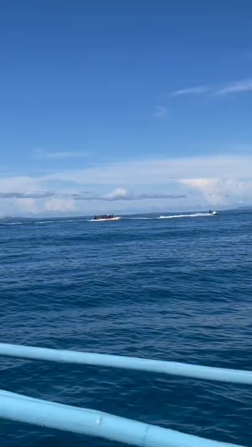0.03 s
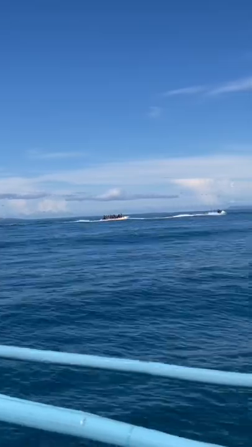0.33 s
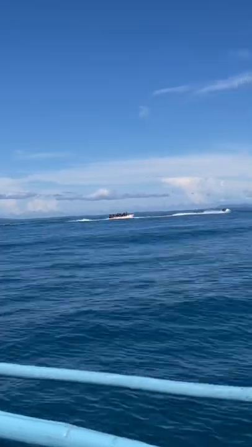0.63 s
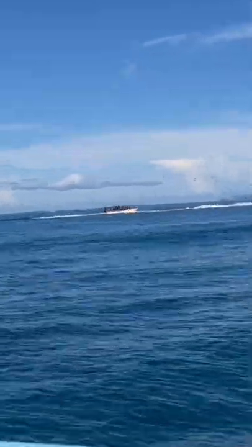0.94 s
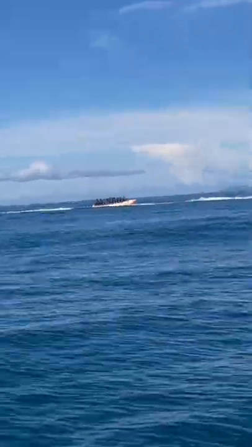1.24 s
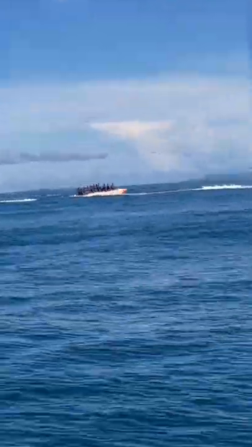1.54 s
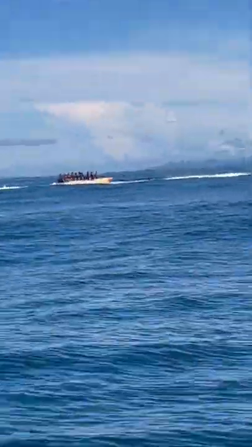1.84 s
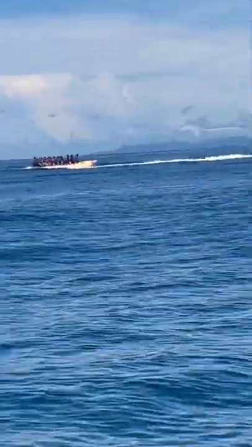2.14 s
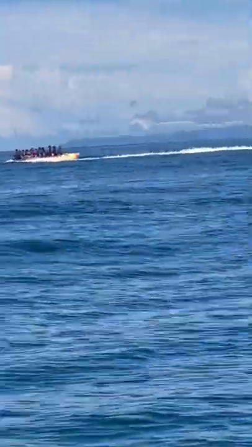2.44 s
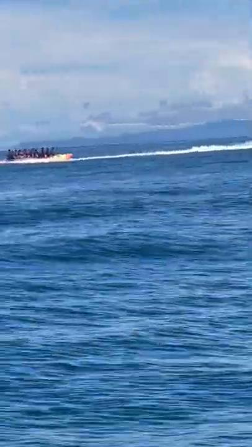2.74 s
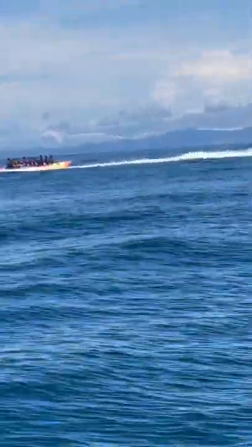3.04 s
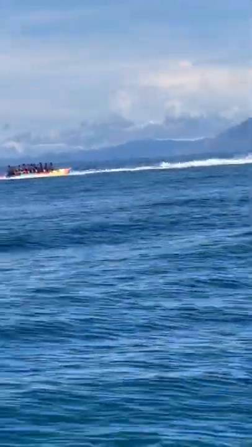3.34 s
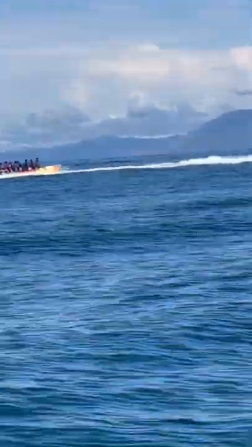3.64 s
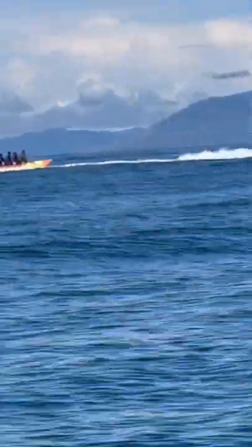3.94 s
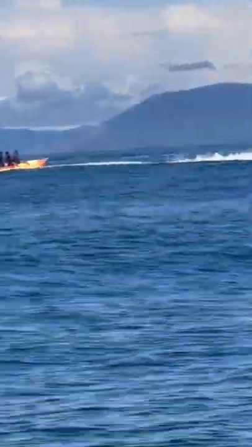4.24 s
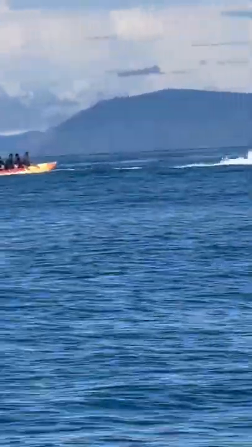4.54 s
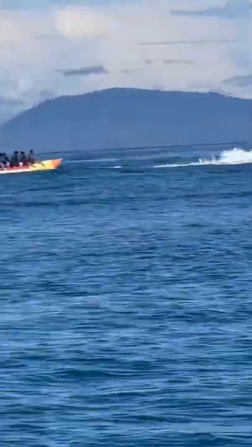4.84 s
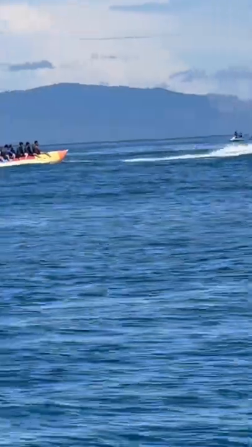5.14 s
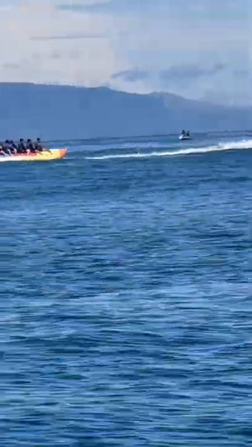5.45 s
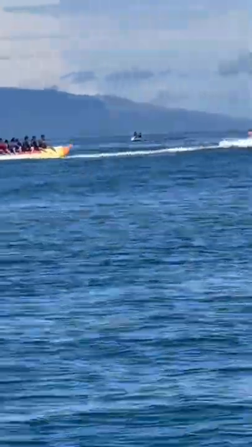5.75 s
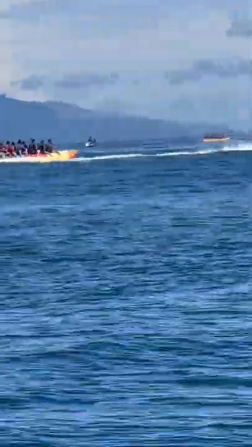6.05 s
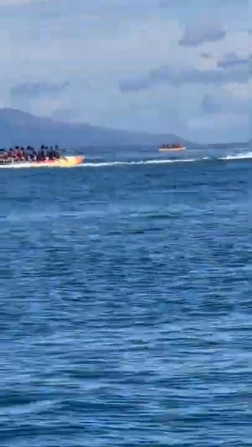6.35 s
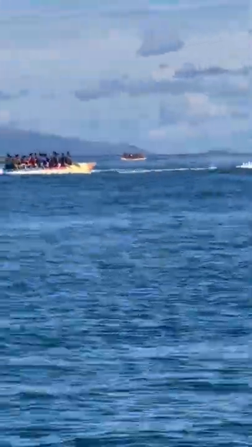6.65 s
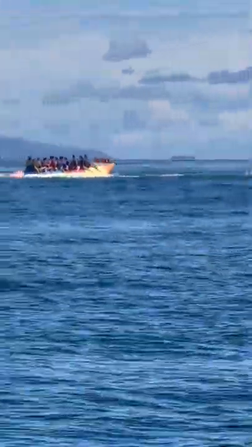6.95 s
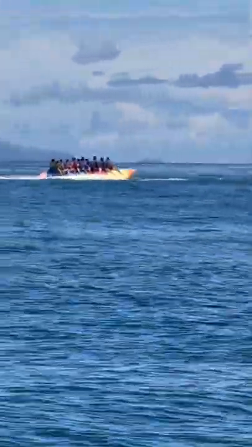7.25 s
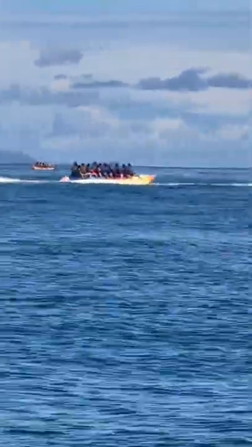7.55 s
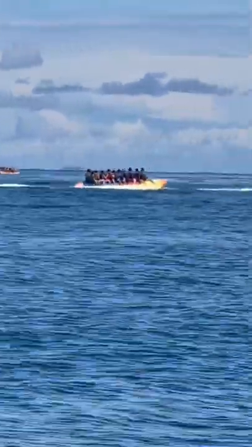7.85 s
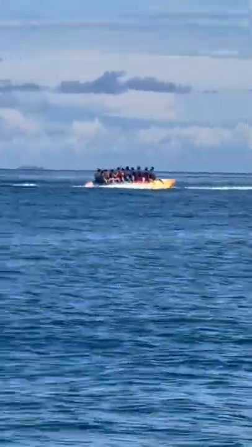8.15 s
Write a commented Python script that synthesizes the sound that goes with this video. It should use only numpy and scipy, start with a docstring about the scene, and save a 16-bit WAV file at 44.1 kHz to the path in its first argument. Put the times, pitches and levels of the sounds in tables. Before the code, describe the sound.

A one-cylinder engine is already running at the start, heard close up on board a small boat at sea. It chugs loudly and evenly at about nineteen beats a second for the whole eight seconds, each beat a low thump with a knock through the deck and a bright rattle of loose metal. A faint, steady wash of water lies beneath it. At about 1 second the stereo image narrows and the knocking softens slightly. Wind rumbles on the microphone throughout, with gusts and short, dull pops from about 1.8 to 3.4 seconds and again near 4.2. The strongest buffeting comes between 5.7 and 6.7 seconds, when the clatter is also a little louder. One more brief gust hits around 7.5 seconds, and the engine keeps the same pace to the end.

```python
"""A one-cylinder engine chugs at about 19 firings a second, heard on board a small outrigger boat.
Each working cycle drives low pressure pulses through exhaust and hull, knocks the deck into resonance
and sets loose metal clattering. Wind eddies buffet the two microphone ports over a faint wash of sea.
After about a second the camera zooms in, and its stereo pickup narrows."""
import sys
import numpy as np
from scipy import signal
from scipy.fft import rfft, irfft, next_fast_len
from scipy.io import wavfile
from scipy.ndimage import uniform_filter1d, map_coordinates

SR = 44100
rng = np.random.default_rng(int(sys.argv[2]) if len(sys.argv) > 2 else 0)


def bounce(signal):
    """Save signal as a 16-bit WAV file at the path given by the first command-line argument."""
    frames = np.transpose(np.atleast_2d(signal))
    limited = np.clip(frames, -1, 1)
    pcm = np.round(limited * 32767).astype(np.int16)
    wavfile.write(sys.argv[1], SR, pcm)


N = 361179
TIME = np.arange(N) / SR

# single eddies that strike the ports: t/s, envelope peak level/dB, f/Hz
EDDY_STRIKES = [(1.82, -12, 370), (1.858, -13, 350), (1.89, -15, 315), (2.093, -8, 400), (2.112, -11, 420),
                (2.196, -15, 380), (2.288, -13, 270), (2.342, -9, 350), (2.548, -14, 380),
                (2.643, -13, 380), (2.656, -12, 270), (2.765, -15, 370), (3.075, -11, 300),
                (3.355, -14, 300), (4.203, -13, 280), (5.581, -16, 350), (5.746, -12, 320),
                (5.786, -6, 420), (5.801, -10, 340), (5.819, -10, 360), (5.852, -9, 410), (5.888, -9, 420),
                (5.948, -12, 350), (6.003, -7, 270), (6.053, -11, 380), (6.095, -13, 300),
                (6.114, -7.5, 520), (6.164, -13, 290), (6.367, -10, 500), (6.373, -4, 430),
                (6.529, -11, 460), (6.684, -15, 340), (6.711, -12, 250), (7.489, -15, 325)]


def amp(db):
    """Decibels to amplitude ratio."""
    return 10 ** (np.asarray(db) / 20)


def unit(x):
    """Normalisation to rms 1."""
    return x / np.sqrt(np.mean(x ** 2) + 1e-20)


def along(points, hz):
    """Interpolation of (f/Hz, value) points on a logarithmic frequency axis."""
    f, values = np.transpose(points)
    return np.interp(np.log(hz + 1), np.log(f + 1), values)


def curve(points):
    """Linear interpolation of (t/s, value) points at every sample."""
    return np.interp(TIME, *np.transpose(points))


def wobble(rate):
    """Smooth random modulation: a spline through `rate` knots a second."""
    return map_coordinates(rng.standard_normal(int(N * rate / SR) + 4), [TIME * rate])


def filtered(x, response):
    """Linear filtering: the spectrum of x times a frequency response."""
    size = next_fast_len(N + SR // 4)
    return irfft(rfft(x, size) * response(np.fft.rfftfreq(size, 1 / SR)), size)[..., :N]


def split(x, edge_hz):
    """Complementary crossover: the parts of x below and above an edge."""
    low = filtered(x, lambda hz: 1 / (1 + (hz / edge_hz) ** 10))
    return low, x - low


def taps(times, sizes):
    """An impulse train: each blow lasts one sample."""
    at = np.round(times * SR).astype(int)
    inside = (at >= 0) & (at < N)
    return np.bincount(at[inside], sizes[inside], N)


def colour(pair, spectrum, patchy_db):
    """Partial coherence: two independent signals mix to stereo whose spectrum flickers in patches."""
    # likeness of the sound at the two ports: f/Hz, coherence
    coherence = [(60, .87), (130, .78), (300, .58), (500, .15), (700, .1), (900, .4), (1300, .42),
                 (1600, .2), (2300, .35), (4000, .25), (7000, .45), (7800, .7), (8600, .9), (9400, .78),
                 (10200, .98), (11300, .82), (11800, .99), (12400, .97), (13000, .6)]
    cells = signal.stft(pair, nperseg=512)[2]
    patches = uniform_filter1d(rng.standard_normal(cells.shape[1:]), size=5, axis=0)
    patches = unit(uniform_filter1d(patches, size=8, axis=1))
    pair = signal.istft(cells * amp(patchy_db * np.minimum(patches, 1.7)), nperseg=512)[1][:, :N]

    def mid_side_gains(hz):
        angle = np.arccos(np.clip(along(coherence, hz), 0, 1)) / 2
        return amp(along(spectrum, hz)) * [np.cos(angle), np.sin(angle)]

    mid, side = filtered(pair, mid_side_gains)
    return unit(np.array([mid + side, mid - side]))


def zoom(pair, midpoint_s=0.89, length_s=0.27):
    """Mid-side narrowing: a wide image leaning left fades into one with a weaker side signal."""
    # treble imbalance of the wide pickup: f/Hz, left minus right level/dB
    lean = [(2700, 0), (3300, 2.5), (4000, 1.5), (5400, 6), (7000, 6.5), (7800, 2), (8700, 0)]
    # side response of the narrow pickup: f/Hz, level/dB
    side_response = [(1400, 0), (1900, -6.5), (2400, -9), (4000, -11.5), (5000, -15), (6000, -23),
                     (7300, -24), (7900, -7), (8600, -9), (9200, 0)]
    wide = filtered(pair, lambda hz: amp(.5 * np.outer([1, -1], along(lean, hz))))
    side = filtered((pair[0] - pair[1]) / 2, lambda hz: amp(along(side_response, hz)))
    narrow = pair.mean(axis=0) + np.outer([1, -1], side)
    closed = np.clip(.5 + (TIME - midpoint_s) / length_s, 0, 1)
    return (1 - closed) * wide + closed * narrow


def ports(hz):
    """Transfer function of the two ports: their phase and level differences depend on frequency."""
    # lead of the left port: f/Hz, phase/rad
    lead = [(100, -.1), (340, -.25), (500, -.9), (650, -2.8), (1400, -2.9), (1800, -5.95), (3100, -5.62),
            (4200, -6.05), (6500, -6.25), (8000, -6.08), (8800, -6.3), (9900, -8.9), (10250, -9.4),
            (11400, -11.6), (11750, -12.5), (12400, -12.85)]
    # imbalance of the ports: f/Hz, left minus right level/dB
    tilt = [(80, 0), (150, 1.1), (250, 2.7), (440, 2), (600, -1), (900, -2.5), (1200, -1.2), (1600, 2.2),
            (2600, -.8), (5500, .7), (9000, 0)]
    halves = np.array([[.5], [-.5]])
    return np.exp(1j * halves * along(lead, hz)) * amp(halves * along(tilt, hz))


def water():
    """The sea washes along the hull as nearly stationary broadband noise."""
    # spectral density of the wash: f/Hz, relative level/dB
    wash = [(100, -29), (400, 6), (900, 1.5), (2000, -1.5), (5000, -11.5), (10000, -39), (13500, -45)]
    return amp(-34.5 + 0.14 * wobble(3.1)) * colour(rng.standard_normal((2, N)), wash, patchy_db=1)


def swells(rows):
    """Incoherent addition: Gaussian swells (t/s, level/dB, half-length/s) sum in power to one gain."""
    return np.sqrt(sum((amp(db) * np.exp(-.5 * ((TIME - s) / length) ** 2)) ** 2
                       for s, db, length in rows))


def wind(breeze_db=-41.5, flurry_db=-12.5, flurry_s=0.012):
    """Turbulence: large eddies rumble, small ones sound brighter, and both grow with each gust."""
    # gusts, weighed against breeze_db: t/s, level/dB, half-length/s
    gusts = [(1.5, -40, 0.069), (1.88, -34.5, .12), (2.11, -31, 0.031), (2.65, -36.5, 0.2),
             (3.08, -31, 0.045), (3.37, -34.5, 0.08), (4.12, -31, .11), (5.3, -37.5, 0.17),
             (5.79, -28.5, 0.057), (6.08, -32.5, 0.24), (6.62, -34.5, 0.11), (7.46, -32.5, 0.054)]
    # spectral density of the large eddies: f/Hz, relative level/dB
    large_eddies = [(15, -44), (28, -35), (42, -18), (55, -13), (85, -5.5), (150, -10), (250, -13),
                    (400, -27.5), (800, -67)]
    # spectral density of the small eddies: f/Hz, relative level/dB
    small_eddies = [(60, 7), (150, -9), (280, 1.5), (450, -3.5), (700, -13), (1200, -38), (3000, -64)]
    gust = np.hypot(1, swells(gusts) / amp(breeze_db))
    rumble_gain = amp(-26 + 2.1 * wobble(14)) * gust ** 0.94
    rumble = colour(rng.standard_normal((2, N)), large_eddies, patchy_db=1)
    swirl_gain = amp(-39 + 3 * wobble(60)) * gust ** 0.97
    swirl = colour(rng.standard_normal((2, N)), small_eddies, patchy_db=1.5)
    # a brief flurry surrounds each slap
    flurries = swells([(s, db + flurry_db, flurry_s) for s, db, _ in EDDY_STRIKES])
    return rumble_gain * rumble + np.hypot(swirl_gain, flurries) * swirl


def slaps(skew_rad=.75, half_length_cycles=.31):
    """An eddy striking the ports is one short pressure swing, with a different phase at each."""
    out = np.zeros((2, N))
    t = np.arange(-SR // 100, SR // 100) / SR
    phases = skew_rad * rng.standard_normal((len(EDDY_STRIKES), 2, 1))
    for (s, db, hz), phase in zip(EDDY_STRIKES, phases):
        envelope = amp(db) * np.exp(-.5 * (t * hz / half_length_cycles) ** 2)
        start = round((s + t[0]) * SR)
        out[:, start:start + len(t)] += envelope * np.sin(2 * np.pi * hz * t + phase)
    return out


def crank(first_firing_s=.0348):
    """Working cycles since the first firing: a four-stroke cylinder fires once in two revolutions."""
    # crankshaft speed: t/s, speed/rpm
    speed = [(0.0, 2311), (0.5, 2276), (0.9, 2306), (1.4, 2296), (2.0, 2312), (3.0, 2303), (4.0, 2312),
             (4.7, 2286), (5.7, 2294), (6.3, 2303), (6.9, 2313), (7.3, 2289), (7.8, 2334), (8.2, 2289)]
    cycles = np.cumsum(curve(speed)) / (2 * 60 * SR)
    return cycles - np.interp(first_firing_s, TIME, cycles)


def harmonics(cycles, orders, waver_rad):
    """Multiples of the firing rate, each randomly modulated in amplitude and phase."""
    return sum(amp(db + 2 * wobble(3)) * unit(np.sin(2 * np.pi * k * cycles + waver_rad * wobble(10)))
               for k, db in orders)


def hum(cycles):
    """Forced vibration at engine orders: the drive's hum fades early while the hull drones on."""
    # partials of the drive: harmonic number, relative level/dB
    drive_orders = [(11, -12), (16, -15), (22, -13), (23, -8), (47, -17)]
    # fading of the drive's hum: t/s, level/dB
    drive_level = [(0, -28), (.8, -30), (1.3, -35), (2.2, -38), (8.2, -44)]
    # partials of the hull: harmonic number, level/dB
    hull_orders = [(11, -41), (12, -40), (14, -43), (16, -42), (19, -50), (21, -49), (22, -50), (23, -50)]
    drive = amp(curve(drive_level)) * harmonics(cycles, drive_orders, waver_rad=.45)
    return drive + harmonics(cycles, hull_orders, waver_rad=.4)


def knock(fired, delay_s=0.004, jitter_s=0.0002, scatter_db=3, rise_s=0.0049):
    """Impulse excitation: the piston's knock rings the damped modes of the deck once a cycle."""
    # modes of engine mount and deck: f/Hz, relative level/dB, t60/s
    modes = [(252, 11, 0.071), (452, 1, 0.1), (507, 4, 0.046), (644, 7.5, 0.072), (800, 5, 0.062),
             (873, 9, 0.052), (947, 7, 0.06), (1170, -2, .06), (1420, 2, 0.039)]
    t = np.arange(SR // 4) / SR
    ring = sum(amp(db - 60 * t / t60) * np.sin(2 * np.pi * hz * t) for hz, db, t60 in modes)
    ring *= 1 - np.exp(-t / rise_s)
    late, size = rng.standard_normal((2, len(fired)))
    blows = taps(fired + delay_s + jitter_s * late, amp(scatter_db * size))
    return unit(signal.fftconvolve(blows, ring)[:N])


def reflected(x, echo_db=-7.5, t60=0.043):
    """Early reflections off deck and gunwales add a short tail, different at each port."""
    t = np.arange(SR // 10) / SR
    tail = rng.standard_normal((2, len(t))) * amp(-60 * t / t60)
    tail /= np.linalg.norm(tail, axis=1, keepdims=True)
    return unit(x + amp(echo_db) * signal.oaconvolve(x[None], tail, axes=1)[:, :N])


def impacts(fired, lead_s=.003, spread_s=.005, scatter_db=2, strikes=3):
    """Repeated impact: one loose part strikes a few times around each firing."""
    u, v, size = rng.standard_normal((3, len(fired), strikes))
    times = fired[:, None] - lead_s + spread_s * np.hypot(u, v / 2)
    return taps(times.ravel(), amp(scatter_db * size).ravel())


def rattle(fired, t60=.16, hold_s=.005, parts=6):
    """High modal density: loose metal parts ring as decaying noise. Returns ringing and blows."""
    # metallic clatter up to about 13 kHz; above 13.4 kHz only a very faint thin sound remains: f/Hz, relative
    # level/dB
    spectrum = [(200, 3.5), (800, -9), (1200, -5.5), (1800, -2), (2900, -2.5), (4300, -8), (6500, -4.5),
                (8400, -1), (9500, -2), (10400, 1.5), (11500, -5), (12900, -21), (13400, -50), (15600, -36)]
    t = np.arange(SR // 7) / SR
    blows = np.array([impacts(fired) for _ in range(parts)])
    rings = rng.standard_normal((parts, 2, len(t))) * amp(-60 * np.maximum(t - hold_s, 0) / t60)
    ringing = sum(signal.oaconvolve(part[None], ring, axes=1)[:, :N] for part, ring in zip(blows, rings))
    return colour(ringing, spectrum, patchy_db=3.8), blows


def covers(blows, width=.7, rest_db=-9, spell_rise_db=6):
    """Resonance: the blows keep modes of covers and pipes ringing, each loudest in its own spell."""
    # modes: f/Hz, relative level/dB, t60/s, peak of the spell t/s, its half-length/s
    modes = [(904, -43, .08, .4, .5), (1058, -45, .08, .4, .7), (1383, -37.5, .1, .5, .3),
             (1460, -42, .06, .4, .5), (1710, -41, .06, 3.5, 4), (1860, -41, .05, 5.8, 1.5),
             (1975, -40, .06, 7.3, 1.6), (2150, -42, .05, 2.2, 1.2), (2380, -41.5, .05, 5.9, 1),
             (2470, -40, .07, .28, .1), (2727, -40.5, .11, 1.6, 1), (3020, -43, .05, 6.4, 1.6),
             (3400, -48, .08, 6.8, 1.3), (3610, -46.5, .07, 7, 1.7), (3720, -47, .11, 7, 1.7)]
    mid = blows[::2].sum(axis=0)
    side = width * blows[1::2].sum(axis=0)
    force = np.array([mid + side, mid - side])
    out = np.zeros((2, N))
    for hz, db, t60, s, length in modes:
        radius = amp(-60 / (t60 * SR))
        feedback = [1, -2 * radius * np.cos(2 * np.pi * hz / SR), radius ** 2]
        ring = signal.lfilter([1, 0, -1], feedback, force)
        spell = np.exp(-.5 * ((TIME - s) / length) ** 2)
        out += amp(db + rest_db + spell_rise_db * spell) * unit(ring)
    return out


def accents(cycles, fired, lead_cycles=.08):
    """Cycle-to-cycle variation: gains of clank and sizzle, each held for one working cycle."""
    # harder and softer firings: t/s, extra clank level/dB, extra sizzle level/dB
    uneven_firings = [(.14, 3, 0), (.24, 3.5, 0), (1.19, .5, -3), (1.24, -2.5, 0), (1.5, 2.5, 2),
                      (1.6, -2.5, -.5), (1.66, 1.5, -3.5), (1.92, 0, 2.5), (2.12, -3, 0), (2.28, -3, -.5),
                      (2.8, 2, 3), (2.9, 0, -3), (3.11, -3.5, 1.5), (3.16, 2.5, -1), (3.22, -2, -2),
                      (3.37, -1, -3), (3.53, 2.5, 2.5), (3.68, -2.5, -1), (4.36, -4, 0), (4.41, 3, -1.5),
                      (4.88, -2.5, -2), (4.94, 4, -.5), (5.3, 1.5, 1.5), (5.51, 2, 2), (5.88, .5, 3.5),
                      (5.98, 1.5, 1.5), (6.19, 0, -3.5), (6.4, 4.5, -2.5), (6.45, -3.5, -2.5),
                      (6.61, 2.5, .5), (6.66, 0, 3), (7.02, -1, -3), (7.08, 1.5, 2), (7.65, 3.5, 4.5),
                      (7.91, 0, -3.5), (8.01, 1, 1.5), (8.12, 0, 3), (8.17, 2.5, 1)]
    db = np.zeros((len(fired) + 1, 2))
    for s, clank_db, sizzle_db in uneven_firings:
        db[np.argmin(np.abs(fired - s))] = clank_db, sizzle_db
    return amp(db)[(cycles + lead_cycles).astype(int)].T


def exhaust(fired, boom_db=-23.5, thump_db=-18.4, jitter_s=0.0002):
    """Source and filter: exhaust and hull round each cycle's pressure pulses into boom and thump."""
    # pulses of one cycle: t/s after firing, relative level/dB
    strokes = [(.0041, 0.5), (0.0104, 2.5), (.032, -4), (.044, -25.5)]
    # response of exhaust and hull: f/Hz, relative level/dB
    response = [(8, -90), (25, -34), (38, -39), (57, -5.5), (77, 3), (96, 5.5), (135, 1), (172, -1),
                (210, -11.5), (270, -9.5), (350, -30), (440, -35), (560, -20), (900, -75)]
    delay, db = np.transpose(strokes)
    late, scatter_db = rng.standard_normal((2, len(fired), len(delay)))
    times = fired[:, None] + delay + jitter_s * late
    pulses = taps(times.ravel(), -amp(db + scatter_db).ravel())
    chug = filtered(pulses, lambda hz: amp(along(response, hz)))
    boom, thump = split(chug, edge_hz=68)
    return amp(boom_db + 1.54 * wobble(3.1)) * unit(boom) + amp(thump_db + .5 * wobble(9.5)) * unit(thump)


def engine():
    """Synchronous excitation: one crank times the hum, knock, clatter and exhaust."""
    # strength of the deck knock and the low clatter: t/s, relative level/dB
    knock_level = [(0.0, -28.5), (0.72, -28), (0.92, -32.5), (4.2, -31.5), (4.85, -36), (5.8, -29.5),
                   (6.9, -37), (8.19, -35.5)]
    # strength of the midrange clatter: t/s, relative level/dB
    body_level = [(0, -39), (1.2, -34), (2.6, -35), (3.6, -33), (4.8, -33), (5.85, -31), (6.4, -34),
                  (7.2, -32), (8.19, -33)]
    # strength of the treble clatter: t/s, relative level/dB
    sizzle_level = [(0.0, -28.5), (0.7, -28), (1.2, -29), (2.4, -30.5), (3.0, -28.5), (4.3, -29.5),
                    (5.2, -27), (5.85, -25.5), (6.4, -27), (6.7, -27.5), (7.45, -28), (8.19, -26)]
    cycles = crank()
    fired = np.interp(np.arange(int(cycles[-1]) + 1), cycles, TIME)
    tones = hum(cycles)
    deck = amp(curve(knock_level) - 1.5) * reflected(knock(fired))
    ringing, blows = rattle(fired)
    dull, bright = split(ringing, edge_hz=1810)
    body, treble = split(bright, edge_hz=4080)
    clank = amp(curve(knock_level) + 3) * unit(dull) + amp(curve(body_level) + 1.35) * unit(body)
    clank += covers(blows)
    sizzle = amp(curve(sizzle_level) + 3.5) * unit(treble)
    clank_gain, sizzle_gain = accents(cycles, fired)
    return exhaust(fired) + deck + tones + clank_gain * clank + sizzle_gain * sizzle


def scene():
    """Superposition: engine, wind and water pass through the pickup; the slaps hit the ports directly."""
    return filtered(zoom(engine() + wind() + water()), ports) + slaps()


def record(dry, opens_s=.034, low_cut_hz=24, top_hz=15800):
    """Soft saturation and band limiting, after a brief silence and a 3 ms fade-in."""
    opened = dry * np.clip((TIME - opens_s) / .003, 0, 1)
    rounded = opened / (1 + np.abs(opened) ** 8) ** (1 / 8)
    return filtered(rounded, lambda hz: (hz < top_hz) * hz ** 4 / (hz ** 4 + low_cut_hz ** 4))


dry = scene()
out = record(dry)
bounce(out)
```